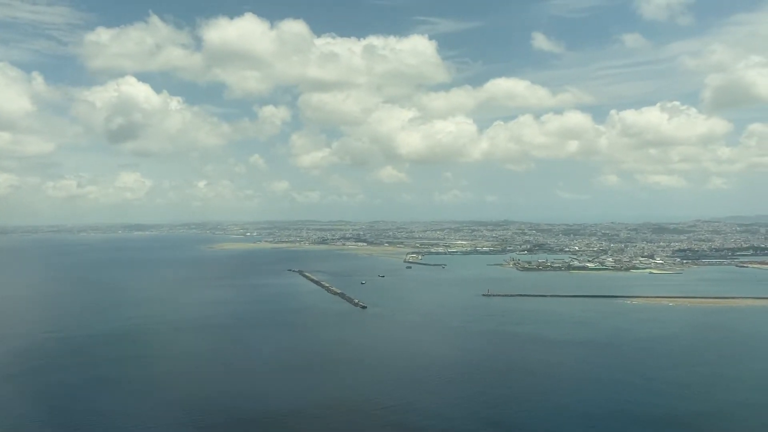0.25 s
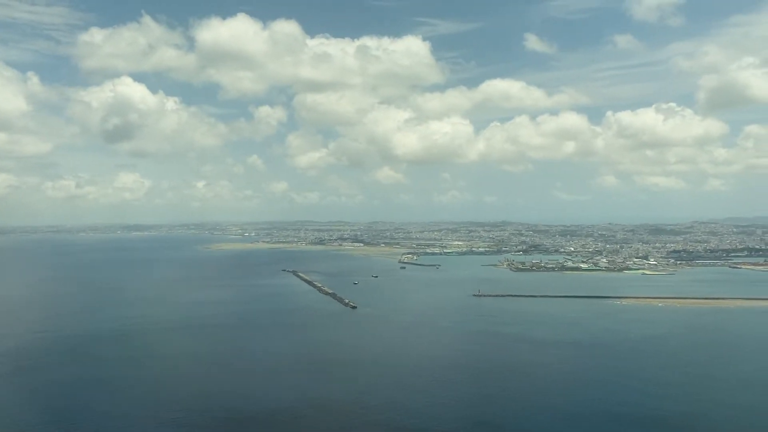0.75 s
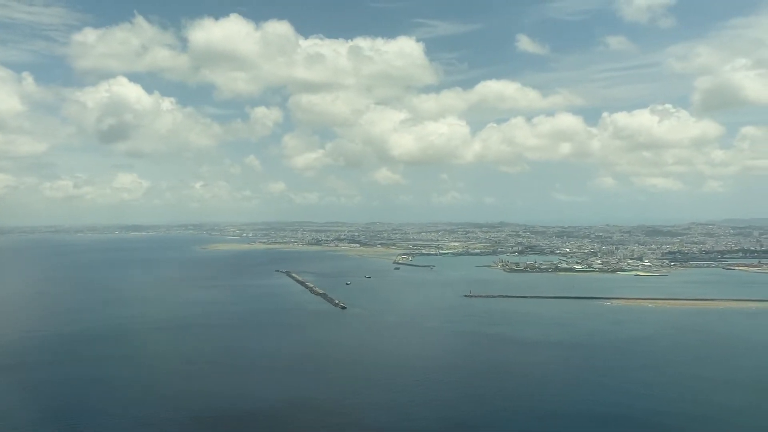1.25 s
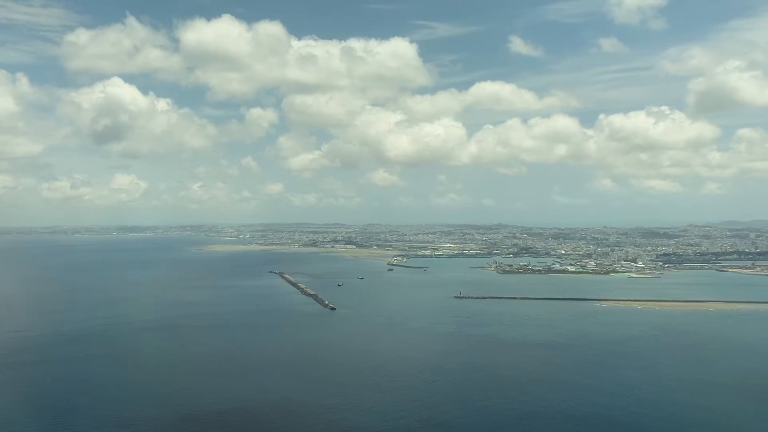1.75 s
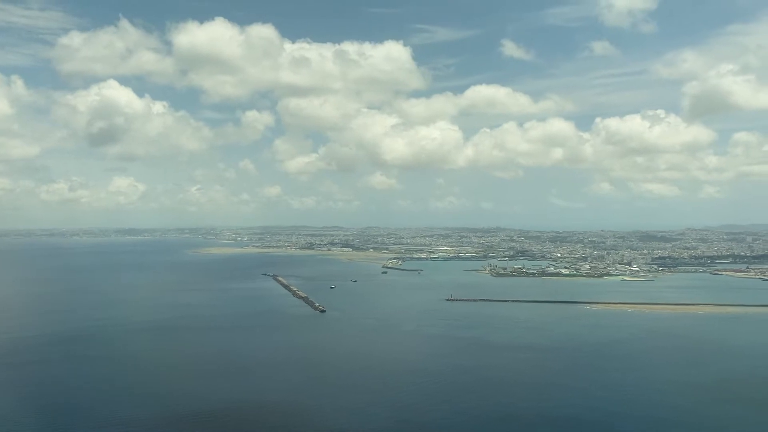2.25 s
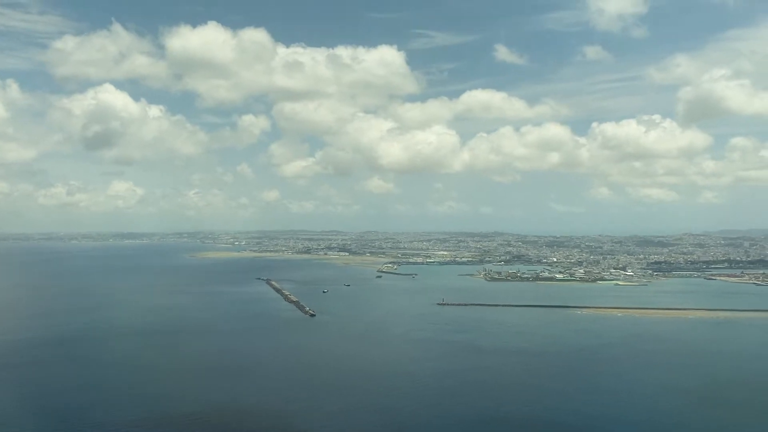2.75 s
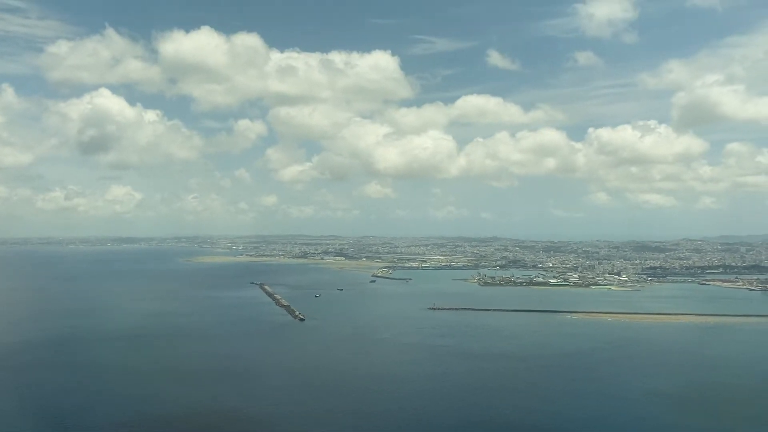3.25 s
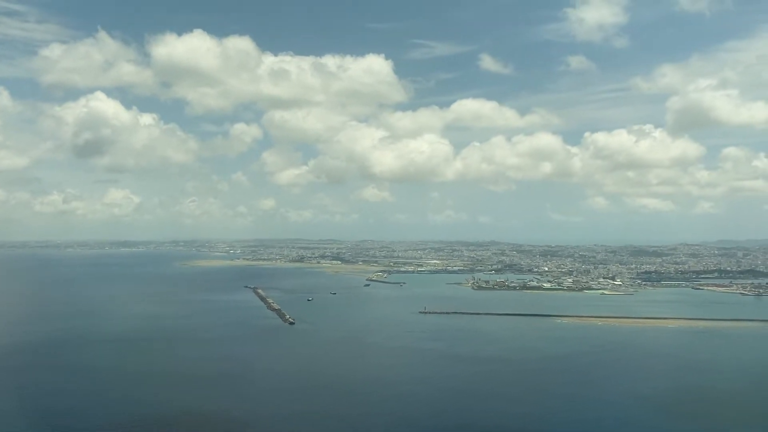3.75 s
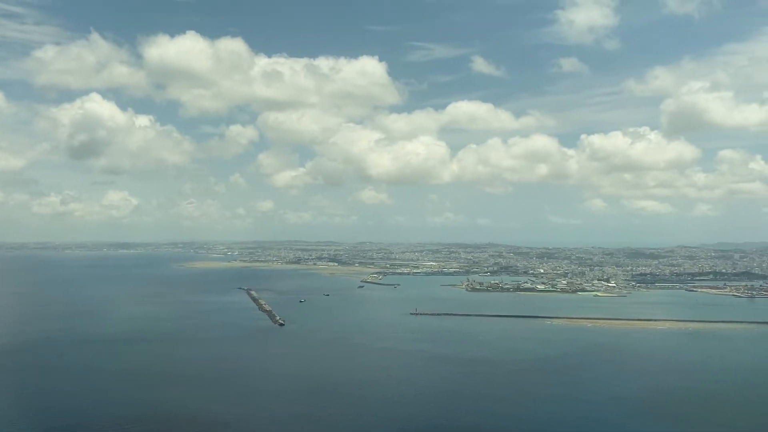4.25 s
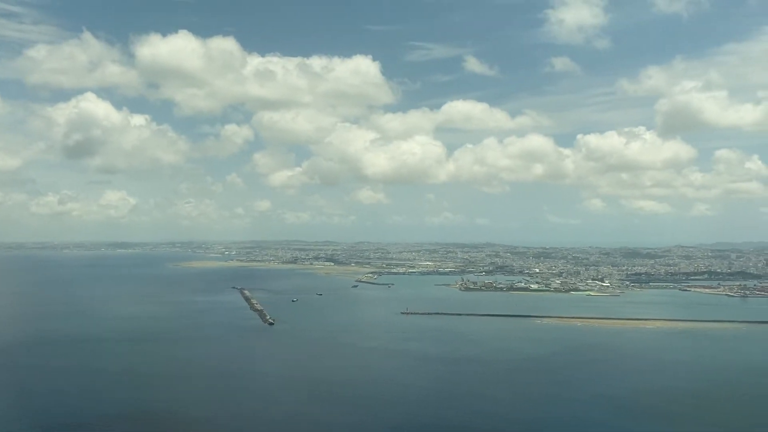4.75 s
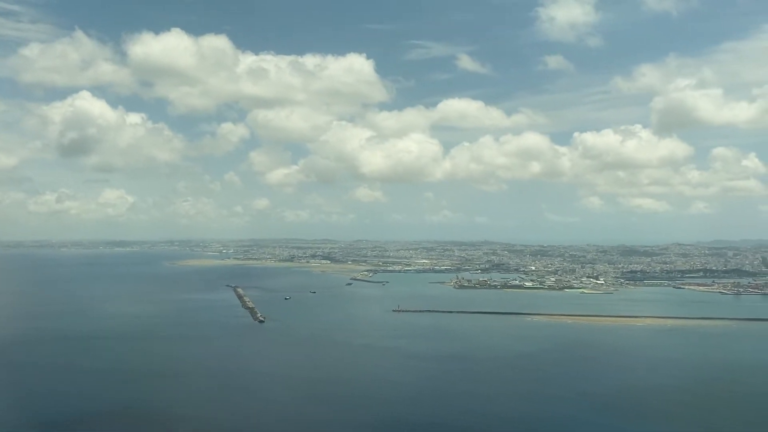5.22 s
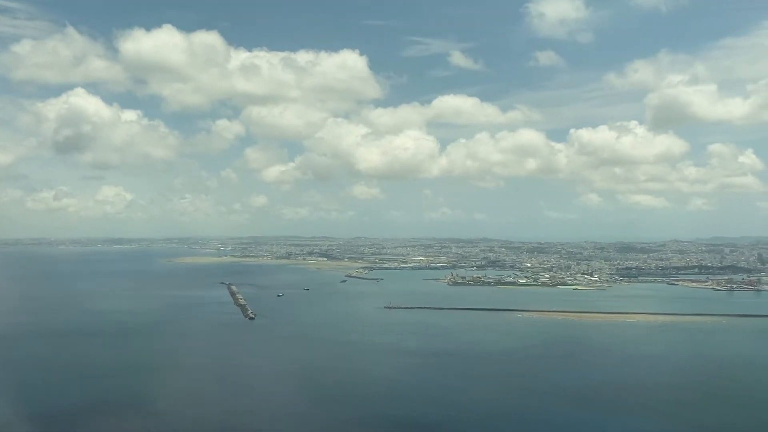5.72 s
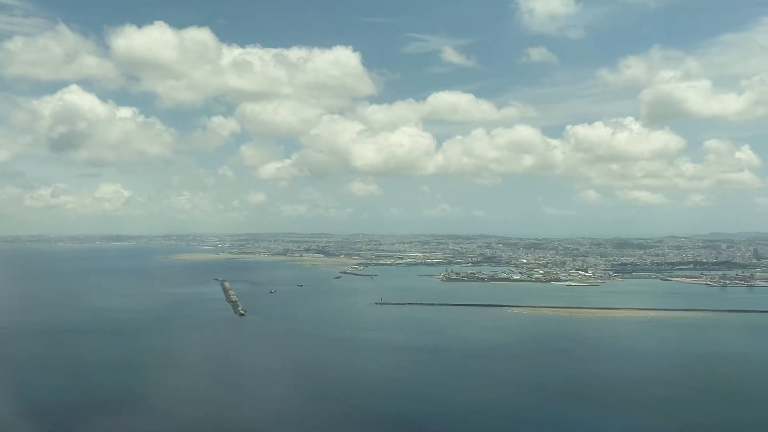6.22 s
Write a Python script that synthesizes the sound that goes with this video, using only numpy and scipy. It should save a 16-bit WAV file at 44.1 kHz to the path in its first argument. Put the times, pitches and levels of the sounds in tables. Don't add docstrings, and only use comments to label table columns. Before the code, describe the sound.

From 0 to 6.5 seconds, an airliner cabin is heard from close to a window seat, in wide stereo. A deep, booming engine rumble, strongest around 60 to 130 Hz, fills everything without pause. Above it lies muffled air rushing along the outer skin, and a quieter, smooth vent hiss, slightly coloured by reflection from the far wall. A faint, pure shaft whine starts near 625 Hz, sags to about 588 Hz by 2.1 seconds, then climbs, faster after 4 seconds, to nearly 800 Hz, its strength shifting between sides. The rush and hiss swell gently with it. Steady fan and pump tones waver faintly; a tiny 11 kHz electrical whistle weakens after 2.2 seconds. Nearly inaudible top-end nozzle fizz has brief early spurts around 0.3, 0.46 and 1.9 seconds, then continues from 2.2 seconds with small pulses. The sound ends abruptly, still roaring.

```python
import sys
import numpy as np
from scipy import signal
from scipy.fft import rfft, irfft, next_fast_len
from scipy.io import wavfile
from scipy.ndimage import uniform_filter1d, map_coordinates

SR = 44100
rng = np.random.default_rng(int(sys.argv[2]) if len(sys.argv) > 2 else 0)


def gain_from_db(level_db):
    decades = np.asarray(level_db, float) / 20
    return 10 ** decades


def unload_wav(signal):
    wavfile.write(
        sys.argv[1],
        SR,
        np.round(np.clip(np.atleast_2d(signal).T, -1, 1) * 32767).astype(np.int16),
    )


N = 285768

# pitch_hz [Hz], level_db [dB per Hz]
RUMBLE_SPECTRUM = [(15, -33), (25, -16), (40, -8.5), (62, -1.5), (78, 1.5), (98, -4.5), (128, 1),
                   (160, -3.5), (190, -6.5), (215, -11), (255, -9), (310, -13.5), (410, -19.5),
                   (530, -62.5)]
# pitch_hz [Hz], level_db [dB per Hz]
SKIN_SPECTRUM = [(250, -25), (400, -2), (450, -1.5), (520, 0), (570, -2.5), (700, -2), (765, -7.5),
                 (845, -6.5), (955, -8.5), (1080, -8.5), (1250, -7.5), (1380, -13.5), (1610, -16),
                 (2050, -70)]
# pitch_hz [Hz], level_db [dB per Hz]
VENT_SPECTRUM = [(1105, -30), (1455, -4), (1610, 0), (1810, -1.5), (2010, -3), (2460, -4), (2810, -10.5),
                 (3510, -12.5), (5150, -16.5), (5420, -22), (6450, -22), (8250, -34), (11300, -46),
                 (12300, -85)]
# pitch_hz [Hz], left_over_right_db [dB], likeness [0-1], right_phase_rad [rad]
PORT_LIKENESS = [(131, 0, .97, 0.1), (309, .4, 0.78, 0.15), (444, 1.2, 0.16, 0.8), (900, 0.5, 0.33, -3),
                 (1760, 2.3, 0.41, 0), (3420, 2.5, 0.73, -1.63), (5301, 8, 0.13, -0.7),
                 (7301, 3.5, 0.5, 0.5), (8160, -1.4, 0.54, -3), (9400, -3, 0.33, -2.5),
                 (10700, -.1, .94, 0.9), (12400, -.1, 1, -2.5), (13900, -.15, .7, -5),
                 (15100, -.15, .72, -.05)]
# start_s [s], pitch_hz [Hz]
SHAFT_SPEED = [
    (0, 626.5),
    (.75, 604),
    (1.4, 592.5),
    (2.1, 587.5),
    (2.8, 593.5),
    (3.5, 612),
    (4.05, 634),
    (5, 705),
    (6.48, 796),
]
# pitch_hz [Hz], left_db [dB], right_db [dB], right_phase_rad [rad]
STANDING_WAVES = [(590, -46, -48, 1.5), (600, -41, -56, 2.9), (612, -38.5, -51, 2.8), (622, -36.5, -49, .3),
                  (634, -37, -51, 0), (650, -43, -46, -.4), (670, -49, -47, -1.9), (688, -45, -42, -2.4),
                  (705, -39, -45, -2.4), (735, -43, -45, -2.9), (765, -51, -51, -2.9),
                  (785, -47, -50, -2.9)]
# pitch_hz [Hz], unsteadiness_hz [Hz], left_db [dB], right_db [dB], right_phase_rad [rad]
MACHINES = [(721, 1.2, -49, -45.5, 1.0), (797, 1.8, -48, -47, 2.6), (1101, 3.3, -52, -55, -0.9),
            (1122, 3.7, -52, -66, -1.9), (1783, 14, -53, -53, 0.3), (1903, 1.5, -47, -51, 1.3),
            (2318, 1.9, -61, -66, -1.4), (2667, 6, -61, -66, -0.7), (3272, 9, -61, -62, -1.1),
            (3882, 2.6, -63, -63, -1.5), (4321, 1.7, -59, -63, -1.6), (5117, 2.3, -64, -76, 0.4),
            (7020, 3.6, -79, -81, 0.2), (8806, 2.0, -82, -79, -3.1), (10002, 2.3, -81, -81, -0.4)]
# pitch_hz [Hz], level_db [dB per Hz]
NOZZLE_SPECTRUM = [
    (11700, -12),
    (13700, -14),
    (14500, .2),
    (15300, -1),
    (16000, -40),
]
# start_s [s], level_db [dB over its flow]
NOZZLE_SPURTS = [
    (.3, 46),
    (.46, 46),
    (1.9, 48),
    (2.79, 8),
    (3.39, 6),
    (4.14, 5),
    (4.78, 8),
    (5.22, 4),
    (6.1, 5),
]

IDLE_HZ = 588


def unit(x):
    return x / np.sqrt(np.mean(np.abs(x) ** 2) + 1e-20)


def columns(rows, at, scale=lambda v: v):
    first, *cols = np.transpose(rows)
    return [np.interp(scale(at), scale(first), c) for c in cols]


def ramp(start_s, end_s):
    return np.clip((np.arange(N) / SR - start_s) / (end_s - start_s), 0, 1)


def wobble(rate_hz):
    steps = np.arange(0, N + 256, 256)
    knots = rng.standard_normal(int(N * rate_hz / SR) + 4)
    coarse = map_coordinates(knots, [steps * rate_hz / SR])
    return np.interp(np.arange(N), steps, coarse)


def rush(spectrum, patchy_db):
    z = signal.stft(rng.standard_normal((2, N + 8192)), nperseg=512)[2]
    patches = uniform_filter1d(rng.standard_normal(z.shape[1:]), size=6, axis=0)
    patches = uniform_filter1d(patches, size=14, axis=1)
    pair = signal.istft(z * gain_from_db(patchy_db * unit(patches)), nperseg=512)[1]
    size = next_fast_len(pair.shape[1])
    hz = np.fft.rfftfreq(size, 1 / SR) + 1
    shared, own = rfft(pair, size) * gain_from_db(columns(spectrum, hz, np.log)[0])
    lean_db, alike, phase = columns(PORT_LIKENESS, hz, np.log)
    alike = np.clip(alike, 0, 1)
    right = alike * np.exp(1j * phase) * shared + np.sqrt(1 - alike ** 2) * own
    both = irfft([shared * gain_from_db(lean_db / 2), right * gain_from_db(-lean_db / 2)], size)[:, :N]
    return both / np.std(both.mean(0))


def tone(hz, left_db, right_db, phase):
    turn = 2 * np.pi * (np.cumsum(hz) / SR + rng.random())
    left = gain_from_db(left_db) * np.sin(turn)
    right = gain_from_db(right_db) * np.sin(turn + phase)
    return np.sqrt(2) * np.array([left, right])


def shaft_hz():
    speed = columns(SHAFT_SPEED, np.arange(N) / SR)[0]
    return uniform_filter1d(speed, size=SR // 3, mode="nearest")


def engine_rumble(thrust):
    return gain_from_db(-19 + 1.2 * thrust) * rush(RUMBLE_SPECTRUM, patchy_db=0.08)


def skin_rush(thrust, sway):
    level_db = -35.1 + 2.5 * thrust - 0.25 + 0.3 * sway
    return gain_from_db(level_db) * rush(SKIN_SPECTRUM, patchy_db=0.86)


def far_wall(x):
    delay_s, echo_db = .00468, -12.5
    dulled = uniform_filter1d(x, size=7)
    return x - gain_from_db(echo_db) * np.roll(dulled, round(delay_s * SR), axis=1)


def vent_hiss(thrust, sway):
    level_db = -37.5 + 3.6 * thrust - 0.37 + 0.31 * sway
    return gain_from_db(level_db) * far_wall(rush(VENT_SPECTRUM, patchy_db=0.67))


def top_rolloff(x):
    lowpass = signal.butter(12, 11900, fs=SR, output="sos")
    return signal.sosfilt(lowpass, x)


def airflow():
    thrust = np.log2(shaft_hz() / IDLE_HZ)
    sway = wobble(6)
    return top_rolloff(engine_rumble(thrust) + skin_rush(thrust, sway) + vent_hiss(thrust, sway))


def engine_whine():
    hz = shaft_hz()
    waver_hz, waver_db = .4 * wobble(8), 1.6 * wobble(7)
    left_db, right_db, phase = columns(STANDING_WAVES, hz)
    return tone(hz + waver_hz, left_db + waver_db + 1.7, right_db - waver_db + .9, phase)


def fans_and_pumps():
    total = np.zeros((2, N))
    for hz, waver_hz, left_db, right_db, phase in MACHINES:
        swell_db = 1.5 * wobble(3.02) + 0.29
        pitch_hz = hz + 0.538 * waver_hz * wobble(5)
        total += tone(pitch_hz, left_db + swell_db, right_db + swell_db, phase)
    return total


def electrical_whistle():
    whistle_hz, early_db, late_db = 11197, -59.5, -63.5
    sinks_from_s, sinks_to_s = 2.2, 2.45
    late = ramp(sinks_from_s, sinks_to_s)
    flicker_db = (.5 + (1.3 - .5) * late) * wobble(11)
    fade_db = 1.1 * np.clip(np.arange(N) / SR - sinks_to_s, 0, 2.7)
    level_db = early_db + (late_db - early_db) * late + flicker_db - fade_db
    return tone(np.full(N, whistle_hz), level_db, level_db, 0)


def nozzle_fizz():
    shut_db, open_db, opens_s, opening_s, spurt_s = -125, -78.5, 2.2, .1, .025
    t = np.arange(N) / SR
    spurts_db = sum(db * np.exp(-((t - start_s) / spurt_s) ** 2) for start_s, db in NOZZLE_SPURTS)
    flow_db = shut_db + (open_db - shut_db) * ramp(opens_s, opens_s + opening_s)
    return gain_from_db(flow_db + spurts_db) * rush(NOZZLE_SPECTRUM, patchy_db=2.6)


def scene():
    return airflow() + engine_whine() + fans_and_pumps() + electrical_whistle() + nozzle_fizz()


def top_cut(x):
    return signal.sosfilt(signal.butter(12, 15800, fs=SR, output="sos"), x)


def record(dry):
    fade_s = .004
    edge = np.minimum(np.arange(N), np.arange(N)[::-1]) / (fade_s * SR)
    mix = dry * np.sin(np.pi / 2 * np.clip(edge, 0, 1)) ** 2
    return top_cut(mix)


dry = scene()
out = record(dry)
unload_wav(out)
```